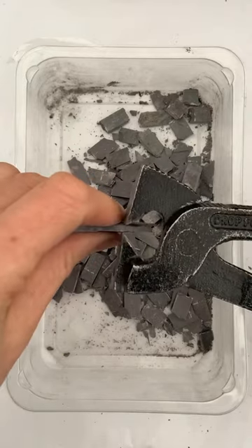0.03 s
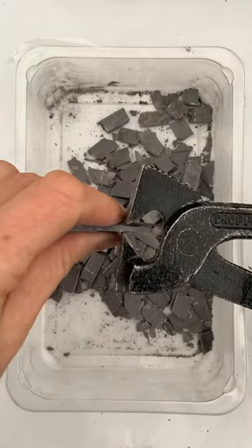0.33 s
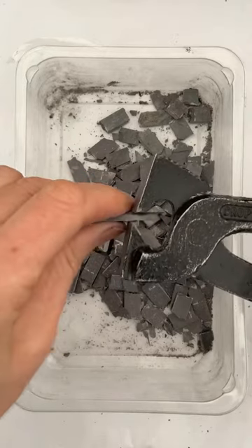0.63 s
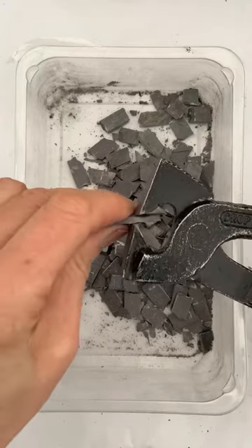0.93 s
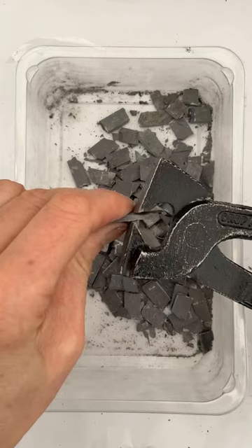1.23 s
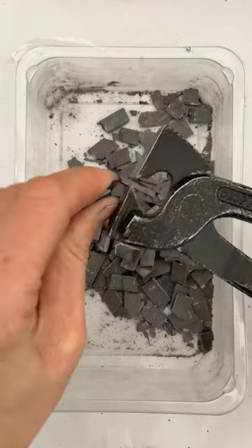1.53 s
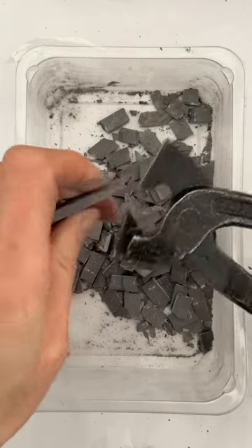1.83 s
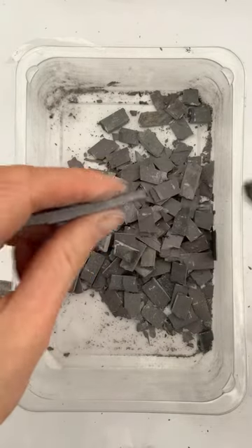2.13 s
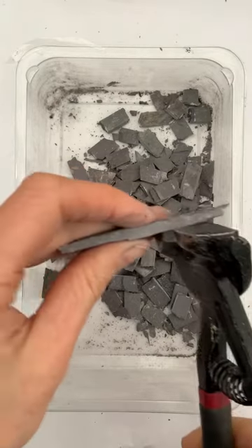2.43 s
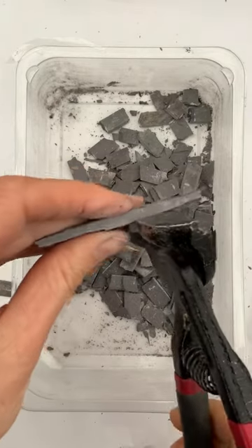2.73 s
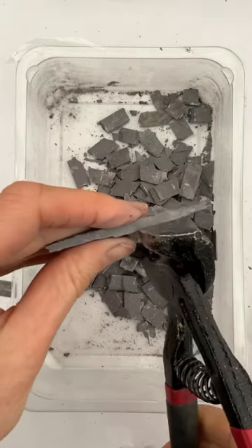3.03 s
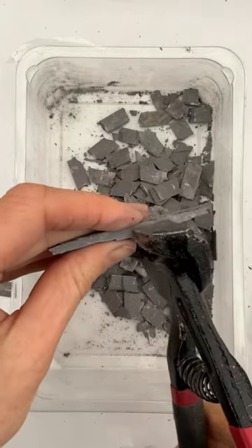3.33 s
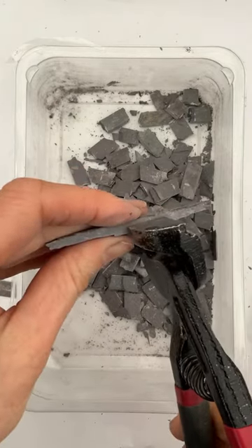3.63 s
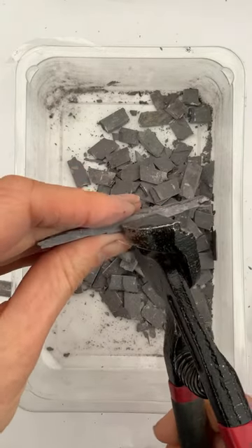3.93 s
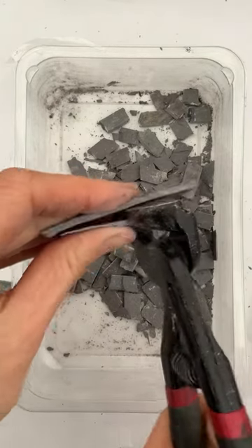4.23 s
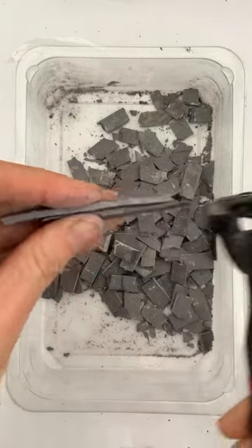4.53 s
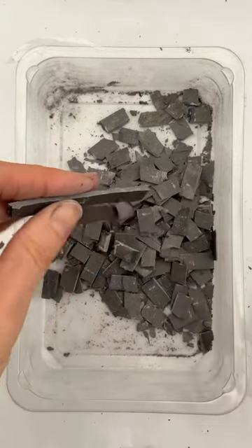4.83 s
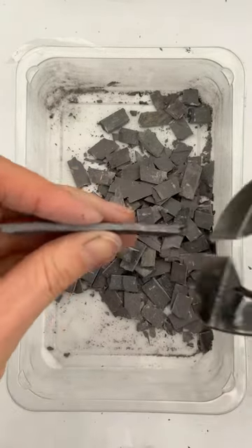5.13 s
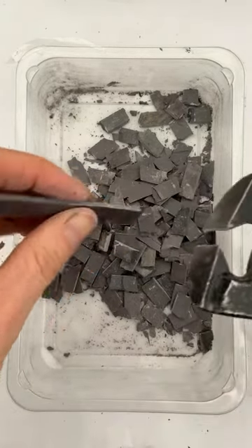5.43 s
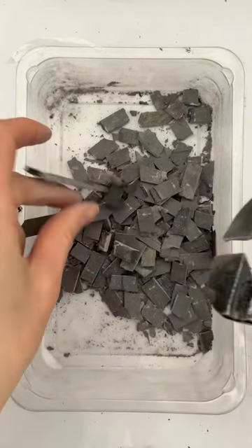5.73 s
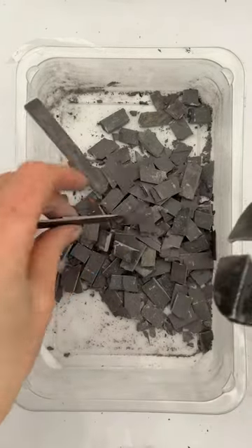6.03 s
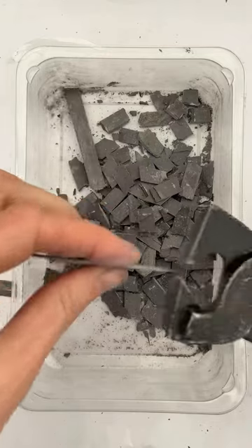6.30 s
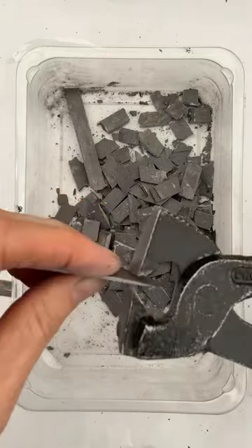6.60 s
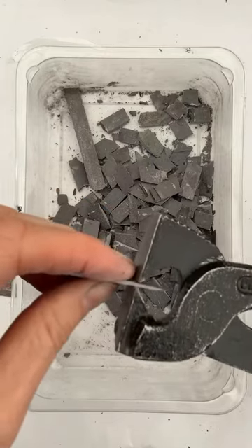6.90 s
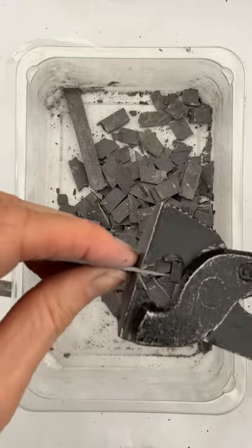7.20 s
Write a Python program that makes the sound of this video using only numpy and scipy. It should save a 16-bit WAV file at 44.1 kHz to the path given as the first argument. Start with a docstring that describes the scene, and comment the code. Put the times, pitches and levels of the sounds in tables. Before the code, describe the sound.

In a small quiet room, hand nippers snap a thin slate strip with a sharp crack and a faint spring ring. Chips clink into a plastic tub, and fingers slide softly over the stone. A second crack is followed by gritty grinding and thin high squeaks from the steel jaws. More pieces drop, knocking the plastic and rattling on the heap, before a few faint scrapes. The microphone is close, with a short echo and low rumble.

```python
"""Hand nippers snap thin slate strips over a plastic tub of slate chips, in a small quiet room.
The steel jaws grind and squeak on the stone, and it cracks twice. Pieces drop, knock the tub
and rattle on the heap. Fingers slide over the slate between cuts.
A phone close by hears it all, with a short echo and the low rumble of the building."""
import sys
import numpy as np
from scipy import signal
from scipy.fft import rfft, irfft
from scipy.io import wavfile

SR = 44100
rng = np.random.default_rng(int(sys.argv[2]) if len(sys.argv) > 2 else 0)


def materialize(psi):
    """Save the field psi as 16-bit PCM at rate SR to the path in sys.argv[1].

    A 1-D psi becomes a single channel; in a 2-D psi each row is a channel.
    """
    bounded = np.clip(np.atleast_2d(psi).T, -1, 1)
    quanta = np.round(bounded * 32767).astype(np.int16)
    wavfile.write(sys.argv[1], SR, quanta)


N = 324576
T = np.arange(N) / SR
GRAIN = rng.standard_normal(N)  # noise that every burst takes a piece of
TOP_HZ = 16000

# Levels in dB are relative. A fade time (t60) is how long a sound takes to fall by 60 dB.
# The tone of a dull knock of the jaws. Each row: frequency in Hz, level in dB.
JAW_TONE = [(60, -21.5), (140, -3), (300, -2.5), (550, -3.5), (950, 0.5), (1600, -6), (3000, -5.5),
            (8000, -24.5)]
# The tone of slate clinking on slate. Each row: frequency in Hz, level in dB.
CLINK_TONE = [(500, -3.5), (2000, -34.5), (3200, 0.5), (4000, 1), (5200, -2.5), (7000, -2.5), (8400, -2),
              (10500, 8.5), (13000, 6), (15200, 10), (16500, -6)]
# The tone of the echoes. Each row: frequency in Hz, level in dB.
ECHO_TONE = [(80, 2), (200, -7.5), (600, -9), (1400, -8.5), (3000, -14.5), (6500, -12.5), (10000, -20),
             (16000, -18)]


def snaps(crack_db=12, spring_db=-32, held_t60=.032):
    """A crack runs through the stone in milliseconds; the jaws knock, the strip and spring ring on."""
    # Breaks in the stone. Each row: start in seconds, level in dB, fade time in seconds,
    # then the dB added to that level for the strip, the jaws and the spring.
    breaks = [(1.4372, -29.5, .012, -20.5, -14, -18.5), (1.4405, 2.5, 0.009, -20.5, -18, 0),
              (1.442, -9, .014, -15, -11, -9.5), (4.08, -17.5, .012, -10, -22, -23),
              (4.0832, -1.5, 0.014, -8.5, -25, -23.5), (4.0835, -5, 0.011, -7.5, -34.5, -32.5),
              (4.0901, -8, 0.0091, 2, -29.5, -22), (4.0914, -5.5, 0.025, -0.5, -26, -28),
              (4.095, -16, .01, 9, -25.5, -30)]
    # The notes of the strip and the nipper spring. Each row: pitch in Hz, level in dB, fade in seconds.
    strip_notes = [(2962, 0, 0.074), (2875, -7.5, 0.04), (3300, 0, 0.037), (3490, -9, 0.053),
                   (3320, -6.5, 0.052), (5830, -13, .03), (5660, -3, 0.018), (7300, -5.5, 0.058),
                   (7300, -12.5, 0.081), (9010, -6.5, 0.045), (9600, -4.5, 0.059), (10100, -5, 0.043)]
    spring_notes = [(921, 9, .35), (1669, -12, .4), (2089, -3, .55), (2125, -8, .6), (2152, -6, .8),
                    (2200, -8, 1), (2234, -4, 1.15), (2266, -9, 1.4), (2300, -12, 1.7)]
    # The tone of cracking slate. Each row: frequency in Hz, level in dB.
    crack_tone = [(80, -31), (200, -31.5), (900, -19), (1500, -15), (2700, -5.5), (3700, 7), (5200, -2.5),
                  (7100, 3.5), (8400, -7), (10000, 4), (13000, 5), (16000, 1.5)]
    cracks, knocks, rings = np.zeros((3, N))
    held_notes = [(hz, db, min(t60, held_t60)) for hz, db, t60 in strip_notes]  # holding cuts them short
    for start, db, t60, strip_db, knock_db, ring_db in breaks:
        size = amp(db + crack_db)
        add(cracks, start, size * burst(t60))
        add(knocks, start, size * amp(knock_db) * burst(0.016))
        add(rings, start, size * amp(strip_db) * ring(held_notes, scatter_db=-3, detune=0.018))
        add(rings, start, size * amp(ring_db + spring_db) * ring(spring_notes))
    return through(cracks, unit(response(crack_tone))) + through(knocks, unit(response(JAW_TONE))) + rings


def grinding(squeak_db=-5, grit_db=1, width_hz=220, swell_share=0.55):
    """Steel sticks and slips on stone: grit, and a thin unsteady squeak with a pitch for each stroke."""
    # Strokes of the jaws. Each row: start and length in seconds, level in dB, squeak in Hz, extra grit dB.
    strokes = [(4.176, 0.069, -50.5, 11400, 7), (4.271, 0.17, -48, 11000, 4),
               (4.421, 0.071, -38.5, 10800, 1.5), (4.639, 0.063, -49.5, 11400, -7.5),
               (4.723, 0.034, -46, 11870, -12), (5.282, 0.034, -61, 10850, -10),
               (5.328, .11, -66, 10900, -7.5), (5.513, 0.047, -53, 11030, -19),
               (5.634, 0.051, -62.5, 10840, -10), (6.29, 0.18, -70.5, 12000, 3),
               (6.525, 0.039, -59, 11350, -7.5), (6.7, 0.074, -55, 11570, -9.5),
               (6.836, 0.019, -50, 11860, -17.5), (7.002, 0.022, -45, 12000, -23),
               (7.068, 0.1, -66, 12050, -12)]
    # The tone of the grit. Each row: frequency in Hz, level in dB.
    grit_tone = [(300, -32), (900, -20), (2500, -19), (4000, -9.5), (5200, -14.5), (7000, -14.5),
                 (8400, -20.5), (10000, -4), (13800, -2), (16000, -3.5)]
    pressure, grit_strength, pitch_hz = np.zeros((3, N))
    for start, length, db, squeak_hz, extra_db in strokes:
        push = amp(db) * stroke(start, length, attack_s=swell_share * length, release_s=0.0078)
        pressure += push
        grit_strength += amp(extra_db) * push
        pitch_hz[T >= start] = squeak_hz
    # Multiplying a pure tone by slow noise makes it waver.
    slips = butter_filter([friction(2.4, 380), friction(3, 320)], 1, width_hz, "low")
    pure_tone = np.exp(2j * np.pi * np.cumsum(pitch_hz) / SR)
    squeak = level(np.real((slips[0] + 1j * slips[1]) * pure_tone))
    squeak = butter_filter(squeak, 2, 7000, "high")
    grit = level(through(friction(rough_db=5, rate=600), response(grit_tone)))
    return amp(squeak_db) * pressure * squeak + amp(grit_db) * grit_strength * grit


def jaws(slip_db=17, tap_db=16, grab_s=.0012, tap_rise_share=0.11):
    """Each slip rings the steel cutting edge; placing the jaws gives dull taps and short scrapes."""
    # The jaws slip on the stone and chirp. Each row: start in seconds, level in dB.
    slip_times = [(4.3847, -27), (4.4096, -27), (4.4411, -16.5), (4.4514, -21.5), (4.461, -16.5),
                  (4.4905, -21.5), (4.7449, -37), (7.024, -42.5)]
    # The jaws touch the strip. Each row: start in seconds, level in dB, fade time in seconds.
    tap_times = [(2.742, -59.5, 0.097), (2.842, -56.5, 0.11), (3.059, -62.5, 0.12), (3.363, -62, 0.033),
                 (3.93, -62.5, .02), (4.268, -46.5, 0.025), (4.414, -51.5, 0.026)]
    # The notes of the cutting edge. Each row: pitch in Hz, level in dB, fade time in seconds.
    edge_notes = [(3640, -25, .03), (4270, -29, .03), (10550, -7, .025), (10800, 0, .035),
                  (11850, -11, .02), (13700, -8, .02), (15500, -12, .02)]
    slips, taps = np.zeros((2, N))
    for start, db in slip_times:
        chirp = ring(edge_notes, scatter_db=3, detune=.003)
        swell = 1 - np.exp(-T[:len(chirp)] / grab_s)
        add(slips, start, amp(db + slip_db) * unit(chirp * swell))
    for start, db, t60 in tap_times:
        add(taps, start, amp(db + tap_db) * burst(t60, rise_s=tap_rise_share * t60))
    return slips + through(taps, unit(response(JAW_TONE)))


def drops(clink_db=11, knock_db=27, thump_db=25, rattle_db=-15, rattle_s=0.049, settle_db=18):
    """A piece clinks on the heap, knocks the plastic, thumps the floor and hops; its neighbours rattle."""
    # Pieces landing. Each row: start in seconds, clink, knock and thump levels in dB, thump pitch in Hz.
    landings = [(1.7887, -12.5, -35.5, -44.5, 107.4), (1.8156, -25, -50, -51, 94),
                (1.965, -43, -64.5, -75, 92), (4.4899, -22.5, -42, -60, 215),
                (4.8337, -13.5, -32.5, -37.5, 110), (4.9176, -21, -27.5, -34.5, 284.5),
                (4.926, -21, -38, -39, 300), (5.7282, -17.5, -31, -37, 113), (5.7707, -28, -41.5, -47, 135),
                (5.7966, -23, -36.5, -53, 118), (5.8073, -15, -20.5, -26, 213),
                (5.8337, -34, -30.5, -38, 215), (5.877, -39, -29, -37, 220),
                (5.9367, -28, -36.5, -47.5, 150), (6.006, -40, -42.5, -65, 127),
                (6.1197, -36.5, -44.5, -54, 127.2), (6.1738, -15, -36.5, -31.5, 343),
                (6.178, -25, -27.5, -40, 110), (6.2332, -34, -45, -56, 112)]
    # The notes of the tub floor. Each row: pitch in Hz, level in dB, fade time in seconds.
    floor_notes = [(102, -2.5, 0.14), (147, -0.5, 0.16), (187, -5, 0.093), (216, 3.5, 0.086),
                   (280, -3, 0.11), (334.3, 3.5, 0.032), (380.5, -2.5, 0.071), (442, 1, 0.11),
                   (557, 1.5, 0.066)]
    clinks, tub = np.zeros((2, N))
    for start, clink, blow, thump, thump_hz in landings:
        add(clinks, start, amp(clink + clink_db) * chip(contact_t60=.018))
        add(tub, start, amp(blow + knock_db) * knock(.028))
        # The landing spot favours notes near the thump pitch; the others lose 7 dB per octave.
        struck_notes = [(hz, db - 7 * abs(np.log2(hz / thump_hz)), t60) for hz, db, t60 in floor_notes]
        add(tub, start, amp(thump + thump_db) * ring(struck_notes, scatter_db=-0.5, detune=0.06))
        for delay, loss_db in hops():
            add(clinks, start + delay, amp(blow + clink_db - loss_db) * chip(contact_t60=.011))
            add(tub, start + delay, amp(blow + knock_db - loss_db) * knock(.018))
        # The heavier the knock, the louder the heap rattles.
        for lateness in rng.random(14):
            size = amp(blow + knock_db + rattle_db - settle_db * lateness)
            add(clinks, start + lateness * rattle_s, size * burst(0.022))
            add(tub, start + lateness * rattle_s, size * knock(0.02))
    return through(clinks, unit(response(CLINK_TONE))) + tub


def hops(longest_s=.022, flight_share=0.69, first_loss_db=13, hop_loss_db=7.5, count=3):
    """Ever shorter and weaker bounces, each given as seconds after landing and loss in dB."""
    hop = np.arange(count)
    flights = longest_s * rng.uniform(.5, 1) * flight_share ** hop
    return zip(np.cumsum(flights), first_loss_db + hop_loss_db * hop)


def knock(t60):
    """A blow on the thin plastic; every spot has its own pitch."""
    # The tone of the tub's plastic. Each row: frequency in Hz, level in dB.
    plastic_tone = [(150, -27.5), (550, -16), (800, -1), (1150, 7.5), (1700, -12), (2300, 1.5), (3100, -4),
                    (4000, -2.5), (5200, -6.5), (8000, -15), (16000, -33.5)]
    shift = 2 ** rng.uniform(-.35, .35)
    spot_tone = [(hz * shift, db) for hz, db in plastic_tone]
    return signal.fftconvolve(burst(t60), unit(response(spot_tone, size=512)))


def chip(contact_t60, ring_db=-3, lowest_hz=3750):
    """One slate chip: a hard contact and a few short notes set by its size."""
    # The notes of a small flat stone. Each row: multiple of the lowest pitch, level in dB.
    plate_notes = [(0.998, -0.5), (1.11, 5.5), (1.85, -1), (2.7, -0.5), (3.05, -4.5), (3.5, 1), (3.9, -2)]
    shift = 2 ** rng.uniform(-.1, .1)
    notes = [(lowest_hz * shift * multiple, db, .024) for multiple, db in plate_notes]
    out = amp(ring_db) * ring(notes, scatter_db=5.5, detune=0.011)[:SR // 10]
    contact = burst(contact_t60)[:len(out)]
    out[:len(contact)] += contact
    return out


def splinters(tick_db=10, crackles_per_s=75, spread_db=11):
    """Splinters break at the jaws and small chips skip about, the faint ones at random."""
    # The clearest chips and splinters. Each row: start in seconds, level in dB.
    clear_ticks = [(0.6058, -32.5), (0.7532, -41.5), (1.5297, -27), (1.5847, -37), (1.6496, -36),
                   (1.9655, -42.5), (3.9524, -47), (3.9828, -44), (4.0492, -47.5), (4.0645, -33),
                   (4.2665, -35), (4.4958, -17.5), (4.5262, -23.5), (4.8564, -36), (4.8754, -32.5),
                   (6.0488, -31.5), (6.0719, -31), (6.1439, -40), (6.1525, -21), (6.1673, -18.5),
                   (6.329, -37), (6.468, -45.5), (6.8478, -41), (7.008, -40.5)]
    # Crackling as the jaws bite or the heap settles. Each row: start and length in seconds, top level dB.
    crackles = [(0.566, 0.14, -47.5), (3.928, 0.21, -49.5), (4.334, 0.23, -37.5), (5.901, .24, -32.5),
                (6.14, 0.092, -21)]
    faint_ticks = [(start + length * when, db - spread_db * weakness) for start, length, db in crackles
                   for when, weakness in rng.random((int(length * crackles_per_s), 2))]
    out = np.zeros(N)
    for start, db in clear_ticks + faint_ticks:
        add(out, start, amp(db + tick_db) * chip(contact_t60=0.011, ring_db=-10))
    return through(out, unit(response(CLINK_TONE)))


def fingers(slide_db=1):
    """Dry skin hisses over the slate."""
    # Finger slides. Each row: start and length in seconds, level in dB.
    slides = [(0.449, 0.067, -68.5), (0.56, 0.089, -69.5), (0.732, 0.049, -76), (1.61, .13, -61.5),
              (1.903, .21, -59.5), (2.156, .16, -57), (2.361, 0.074, -56), (2.5, 0.26, -71),
              (2.805, 0.035, -62.5), (3.035, .06, -75), (3.355, .08, -81), (5.007, 0.13, -58)]
    # The tone of skin on stone. Each row: frequency in Hz, level in dB.
    skin_tone = [(880, -63), (1500, -64), (2300, -26.5), (3180, -36), (3660, -24), (6760, -21), (8080, -18),
                 (12600, -7), (13700, -4.5), (16000, -9)]
    speed = sum(amp(db) * stroke(start, length, attack_s=0.035, release_s=0.026)
                for start, length, db in slides)
    hiss = level(through(friction(rough_db=1, rate=100), response(skin_tone)))
    return amp(slide_db) * speed * hiss


def hands(grip_db=-2, band_hz=(150, 380)):
    """A soft low rub as the hands tighten on slate and handles."""
    # Squeezes of the hands. Each row: start and length in seconds, level in dB.
    grips = [(0.988, 0.53, -79), (2.58, 0.51, -79.5), (3.042, .2, -72.5)]
    effort = sum(amp(db) * stroke(start, length, attack_s=.07, release_s=0.08)
                 for start, length, db in grips)
    rub = butter_filter(friction(rough_db=2, rate=75), 2, band_hz, "band")
    return amp(grip_db) * effort * level(rub)


def room(x, wet_db=-5, gap_s=.004):
    """The walls send back a short, dense echo; the bass stays longest."""
    # How long the echo lasts in each band. Each row: lower edge in Hz, fade time in seconds.
    bands = [(60, .45), (450, .23), (1800, .31), (5000, .32), (10000, .29)]
    tail, t = 0, T[:SR]
    edges = [hz for hz, _ in bands] + [TOP_HZ]
    for (low, t60), high in zip(bands, edges[1:]):
        noise = butter_filter(rng.standard_normal(SR), 3, [low, high], "band")
        tail = tail + noise * np.exp(-np.log(1000) * t / t60)
    tail *= np.clip(t / gap_s - .5, 0, 1)  # the echo takes a moment to arrive
    return amp(wet_db) * through(x, through(unit(tail), response(ECHO_TONE)))


def background(rumble_db=-63.5, side_db=-7, hum_db=-66, hum_hz=50):
    """Low rumble of the building, faint hiss and a mains hum."""
    # The tone of the rumble and hiss. Each row: frequency in Hz, level in dB.
    quiet_tone = [(20, -15.5), (30, -9), (42, 0), (52, -2), (66, -4), (85, -21.5), (130, -22.5),
                  (200, -22.5), (330, -36.5), (500, -41.5), (2400, -49.5), (7200, -49.5), (13800, -53),
                  (15000, -63.5)]
    colour = response(quiet_tone, size=16384)
    mid, side = (level(through(rng.standard_normal(N), colour)) for _ in range(2))
    side = amp(side_db) * butter_filter(side, 1, 130, "high")  # deep bass is alike left and right
    hum = amp(hum_db) * np.sin(2 * np.pi * hum_hz * T)
    return amp(rumble_db) * np.array([mid + side, mid - side]) + hum


def burst(t60, rise_s=0.00055):
    """A burst of tiny contacts that swells quickly and dies away."""
    decay = fade(t60)
    swell = 1 - np.exp(-T[:len(decay)] / rise_s)
    noise = GRAIN[rng.integers(N // 2):][:len(decay)]
    return unit(decay * swell * noise)


def ring(notes, scatter_db=0, detune=0):
    """The fading notes of a struck object; each blow meets it at a different spot."""
    out = np.zeros(2 * SR)
    for (hz, db, t60), (size, shift, side) in zip(notes, rng.standard_normal((len(notes), 3))):
        decay = fade(min(t60, 1.9))
        wave = np.sin(2 * np.pi * hz * (1 + detune * shift) * T[:len(decay)])
        out[:len(decay)] += np.sign(side) * amp(db + scatter_db * size) * decay * wave
    return unit(out)


def friction(rough_db, rate):
    """Noise whose strength jumps with each slip, rate times a second."""
    slips = np.interp(T * rate, np.arange(N), rng.standard_normal(N))
    return level(rng.standard_normal(N) * amp(rough_db * slips))


def stroke(start, length, attack_s, release_s):
    """The strength of one rubbing movement: it swells, holds and dies away."""
    swell = np.sin(np.pi / 2 * np.clip((T - start) / attack_s, 0, 1)) ** 2
    return swell * np.exp(-np.clip((T - start - length) / release_s, 0, 20))


def fade(t60):
    """A curve that falls by 60 dB in t60 seconds."""
    return np.exp(-np.log(1000) * T[:int(t60 * SR) + 2] / t60)


def response(points, size=2048):
    """Turn a tone table into a filter, given as its answer to one click."""
    hz, db = np.transpose(points)
    bin_hz = np.maximum(np.arange(size // 2 + 1) * SR / size, 1)
    gains = amp(np.interp(np.log(bin_hz), np.log(hz), db))
    # Fold the second half onto the first, so nothing sounds before the click.
    cepstrum = irfft(np.log(gains))
    cepstrum[1:size // 2] *= 2
    cepstrum[size // 2 + 1:] = 0
    return irfft(np.exp(rfft(cepstrum)))


def through(x, click_response):
    """Pass a track through a filter or an echo."""
    return signal.fftconvolve(x, click_response)[:N]


def butter_filter(x, order, hz, kind):
    """Keep the lows, the highs or a band; a higher order cuts more steeply."""
    return signal.sosfilt(signal.butter(order, hz, kind, fs=SR, output="sos"), x)


def amp(db):
    """Turn decibels into a multiplier."""
    return 10 ** (np.asarray(db) / 20)


def unit(x):
    """Scale to a total energy of 1."""
    return x / np.sqrt(np.sum(x ** 2))


def level(x):
    """Scale to an average strength (rms) of 1."""
    return x / np.std(x)


def add(track, start_s, x):
    """Mix a sound into a track."""
    i = int(np.clip(start_s * SR, 0, N - 1))
    track[i:i + len(x)] += x[:N - i]


def scene(lag_s=.00045, room_side_db=-4, tub_echo_db=-11, snap_room_db=-2):
    """The work is nearer the right microphone; the tub walls echo at once, then the room answers."""
    # How much weaker close sounds are on the left. Each row: frequency in Hz, left minus right in dB.
    left_tone = [(100, -8), (400, -2), (750, -12), (1250, -9.5), (1900, -8), (3700, -5), (6000, -20.5),
                 (9500, -15.5), (12500, -5.5), (15500, -2)]
    cuts = snaps()
    rest = drops() + splinters() + jaws() + grinding() + fingers() + hands()
    close = cuts + rest
    left = np.roll(through(close, response(left_tone)), int(lag_s * SR))
    left += amp(tub_echo_db) * through(through(close, burst(0.042)), response(ECHO_TONE))
    into_room = amp(snap_room_db) * cuts + rest  # the cuts are nearest the phone, so they echo less
    mid, side = room(into_room), amp(room_side_db) * room(into_room)
    return np.array([left + mid + side, close + mid - side]) + background()


def record(dry):
    """The loudest peaks are softly rounded, and the phone cuts the top of the treble."""
    rounded = np.tanh(dry)
    return signal.sosfilt(signal.ellip(10, .2, 85, TOP_HZ, fs=SR, output="sos"), rounded)


dry = scene()
out = record(dry)
materialize(out)
```